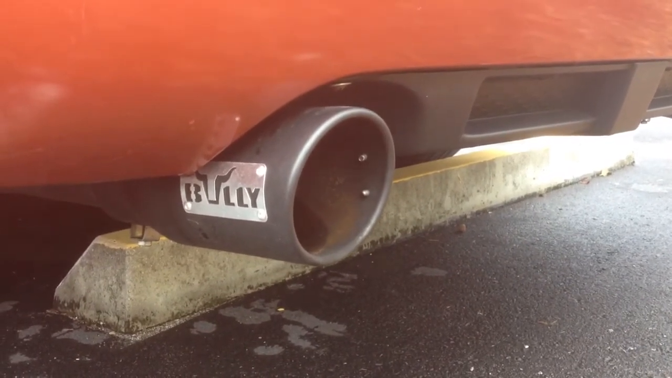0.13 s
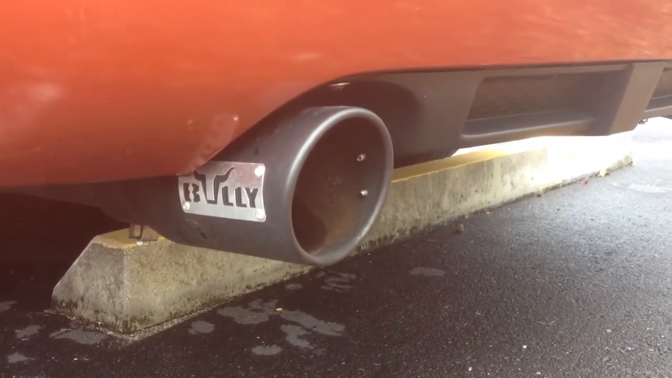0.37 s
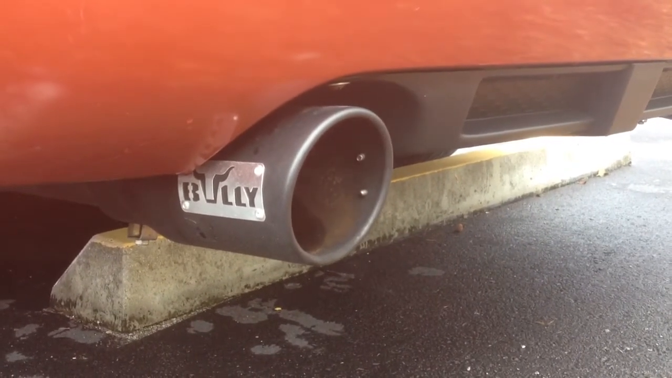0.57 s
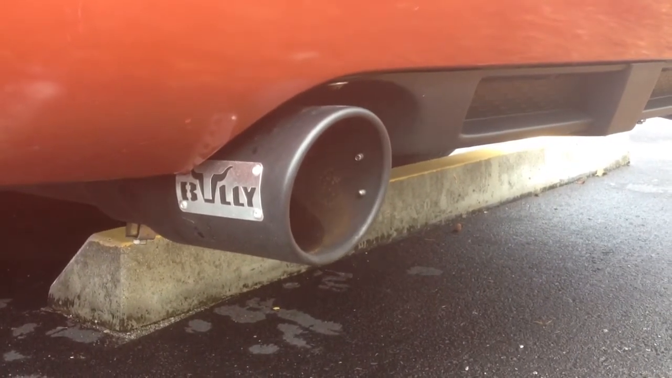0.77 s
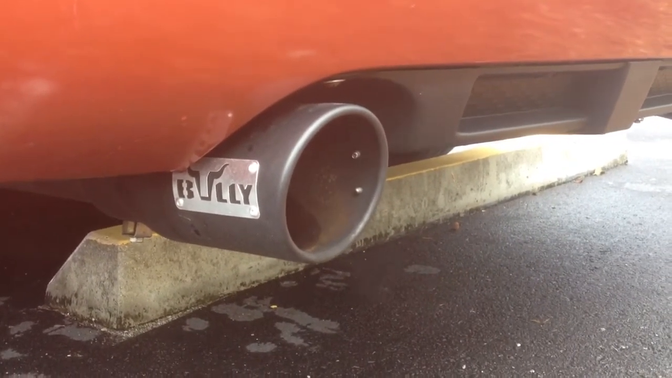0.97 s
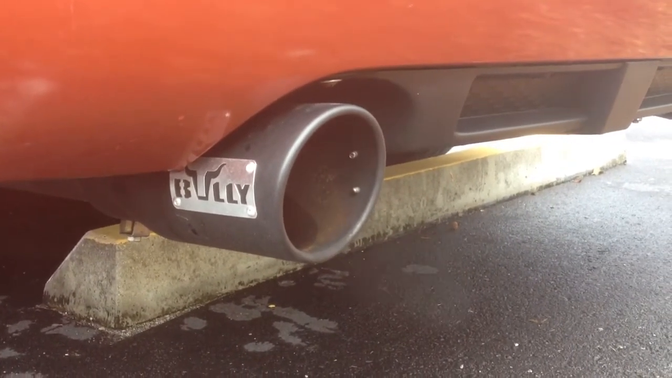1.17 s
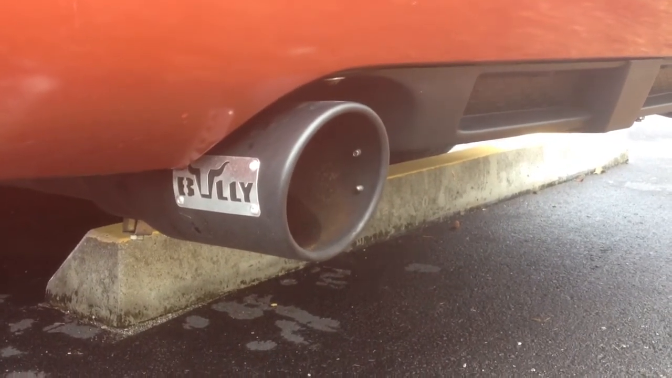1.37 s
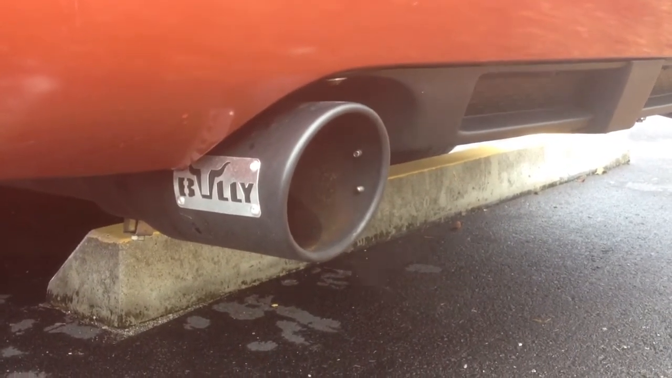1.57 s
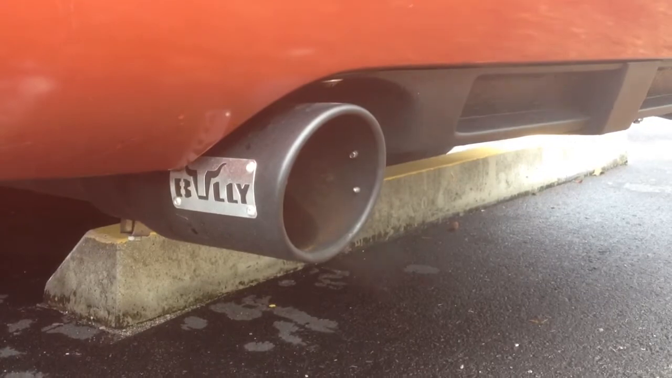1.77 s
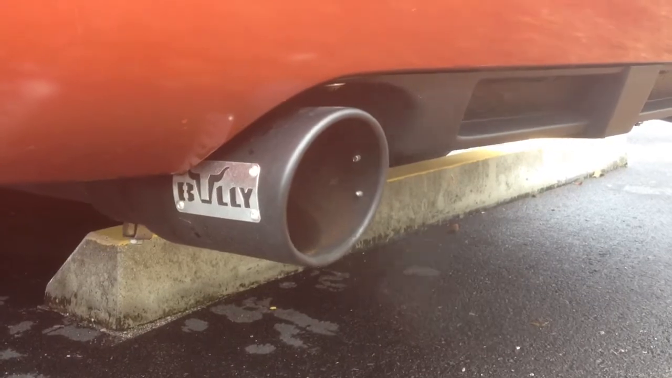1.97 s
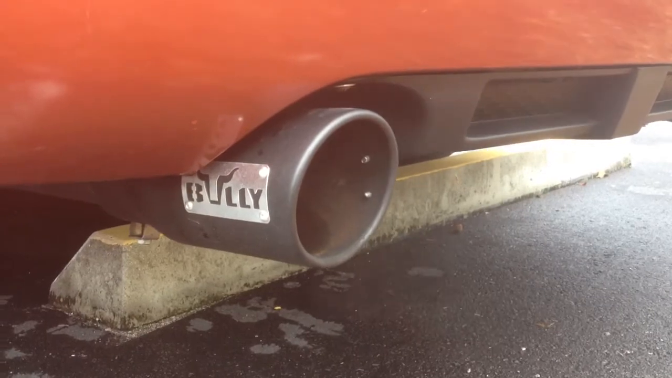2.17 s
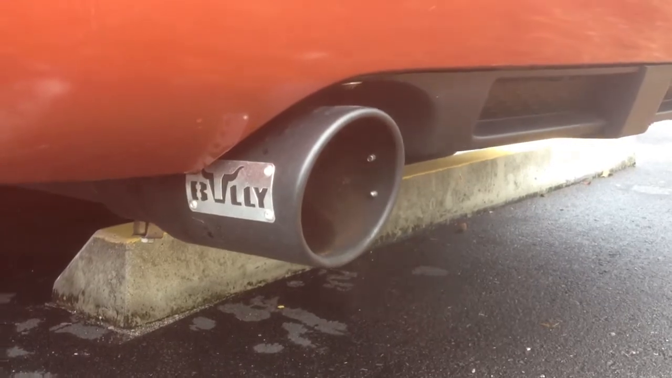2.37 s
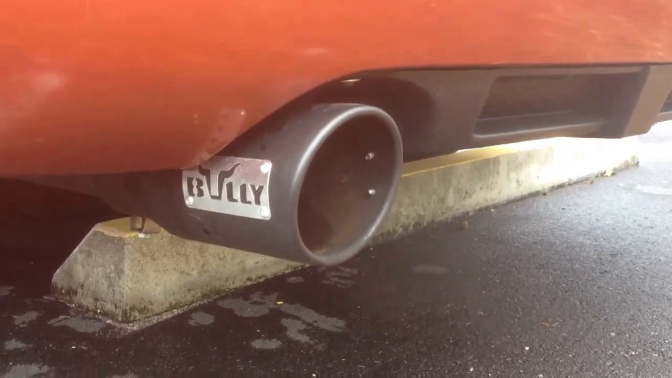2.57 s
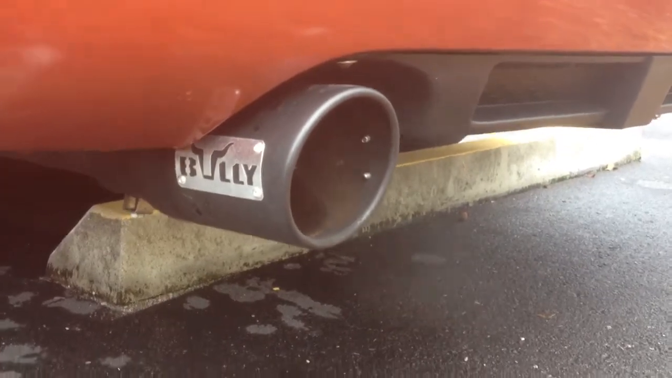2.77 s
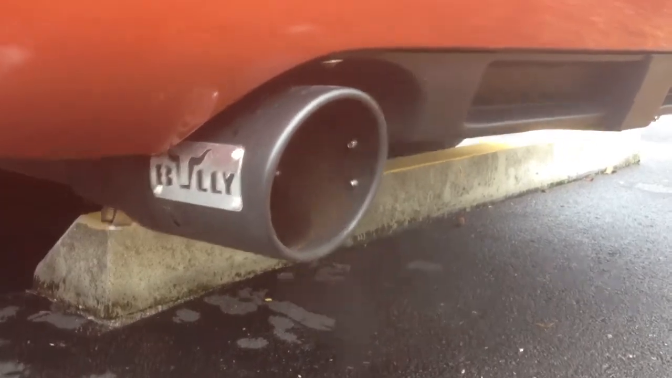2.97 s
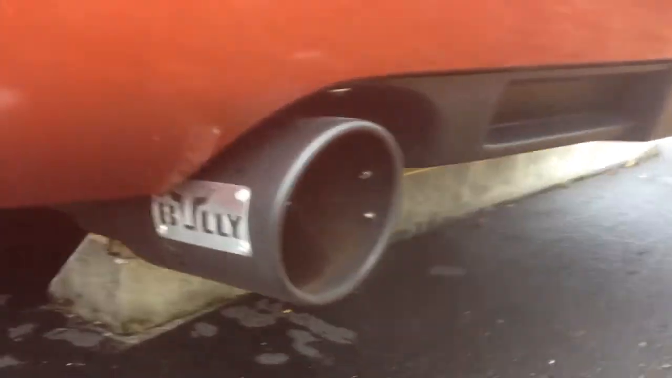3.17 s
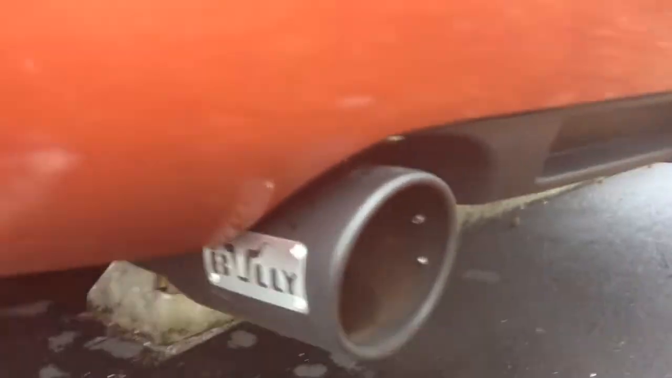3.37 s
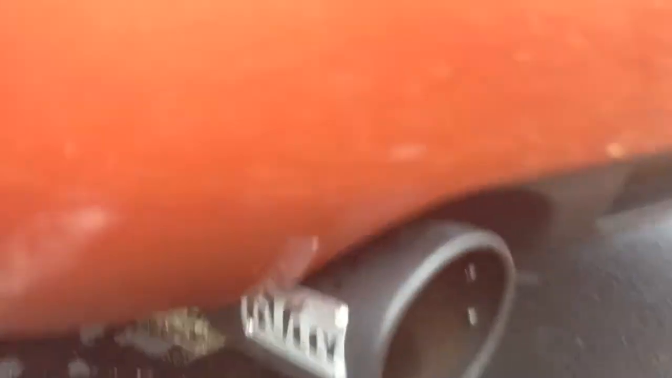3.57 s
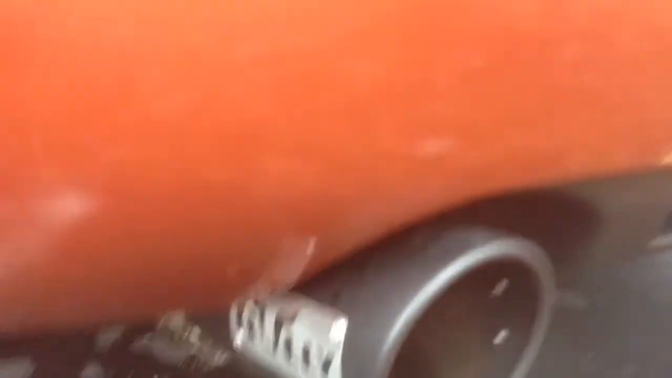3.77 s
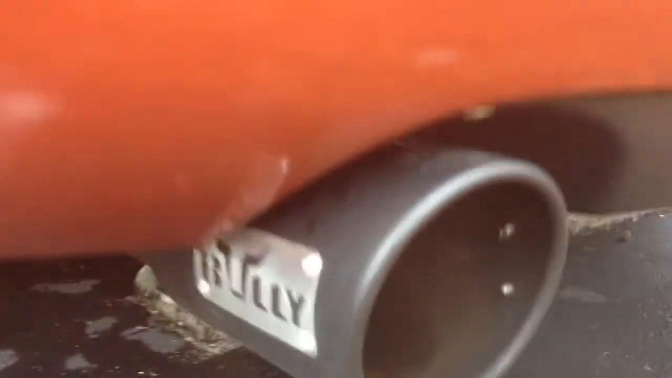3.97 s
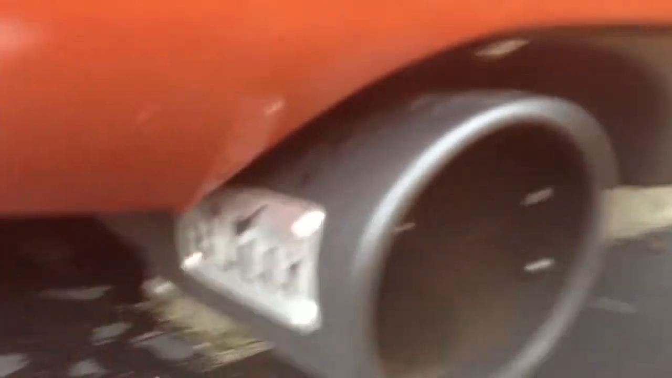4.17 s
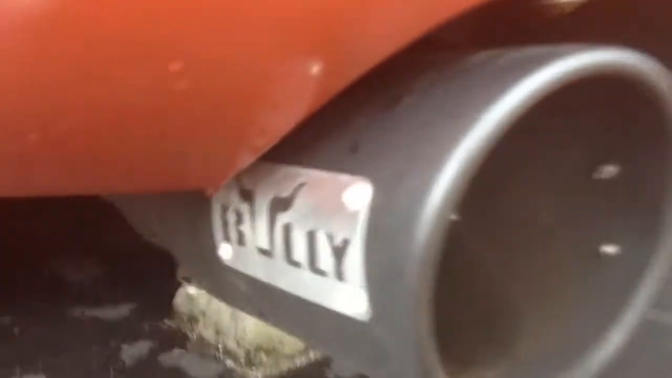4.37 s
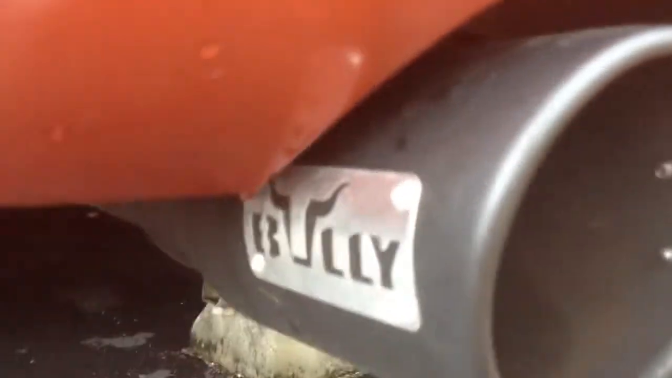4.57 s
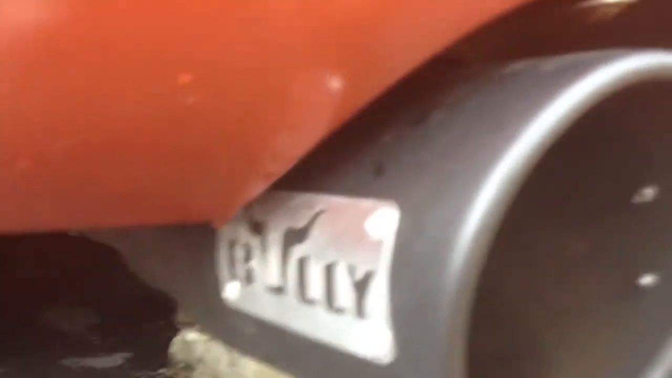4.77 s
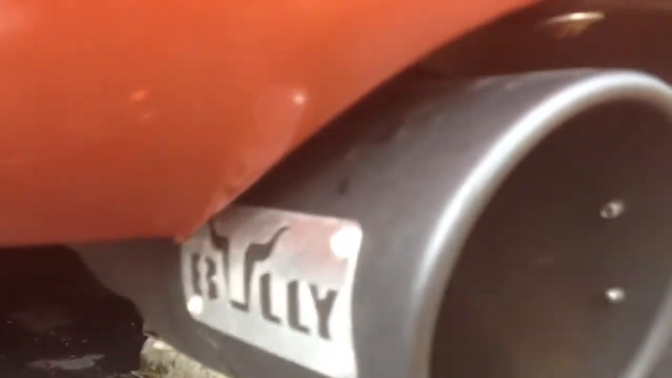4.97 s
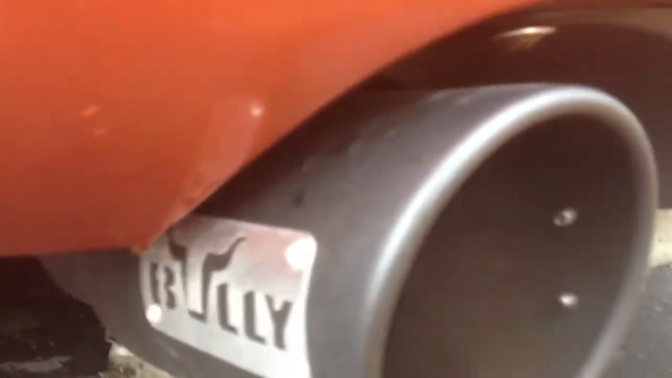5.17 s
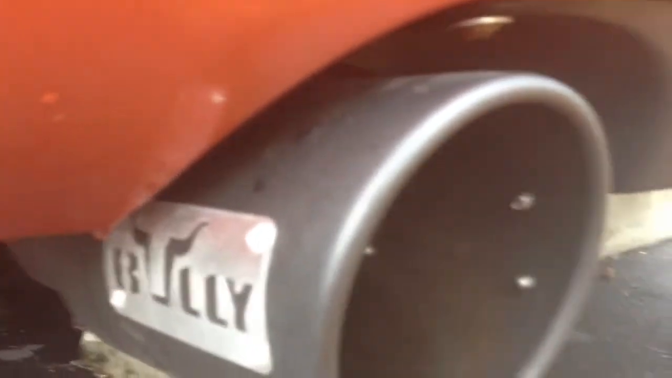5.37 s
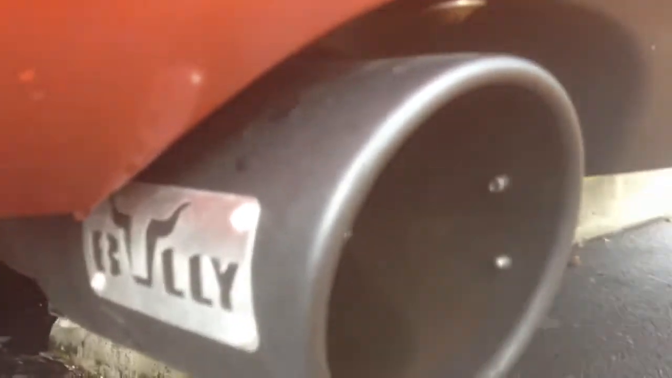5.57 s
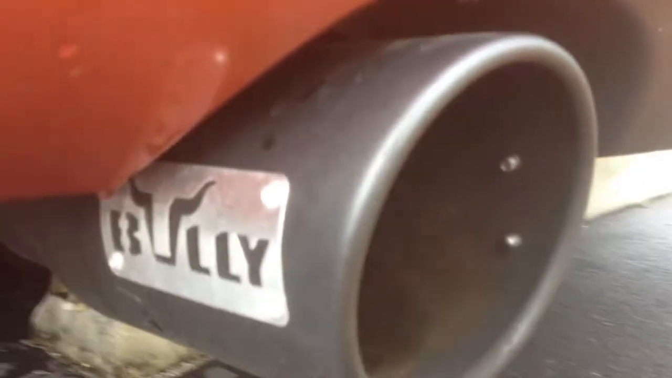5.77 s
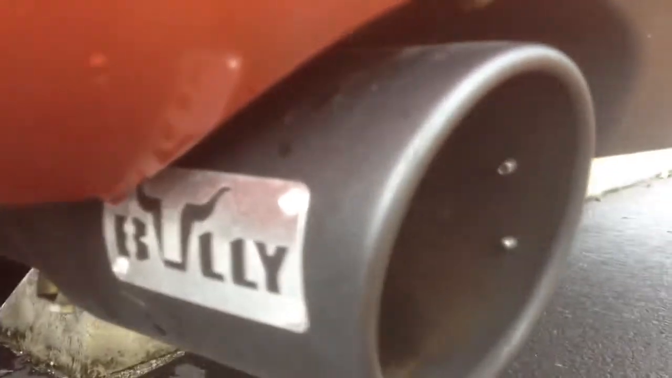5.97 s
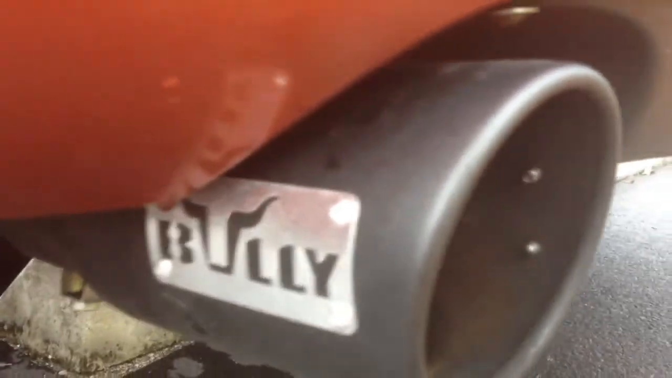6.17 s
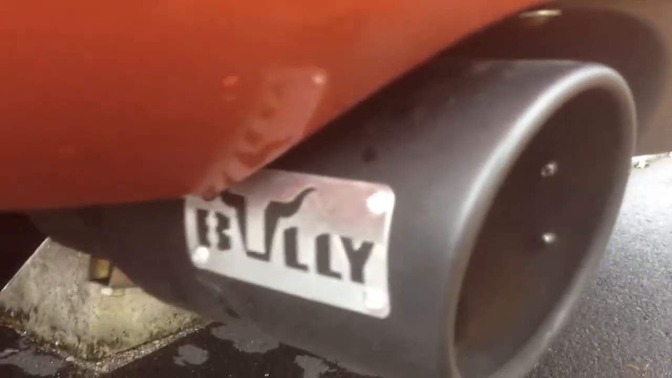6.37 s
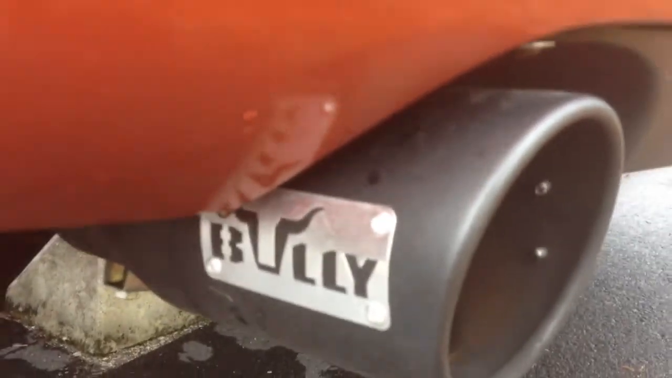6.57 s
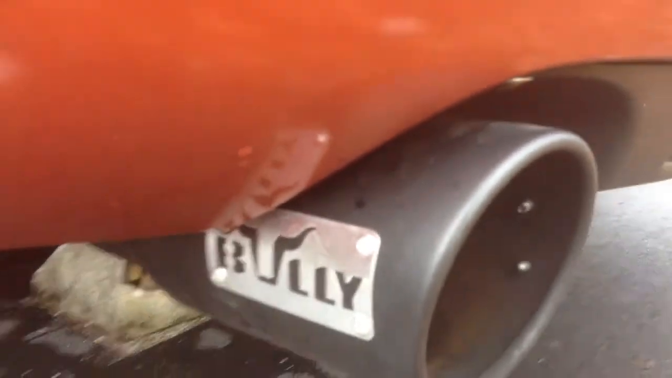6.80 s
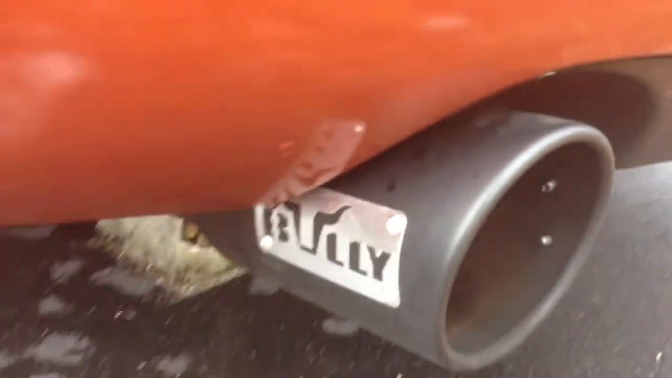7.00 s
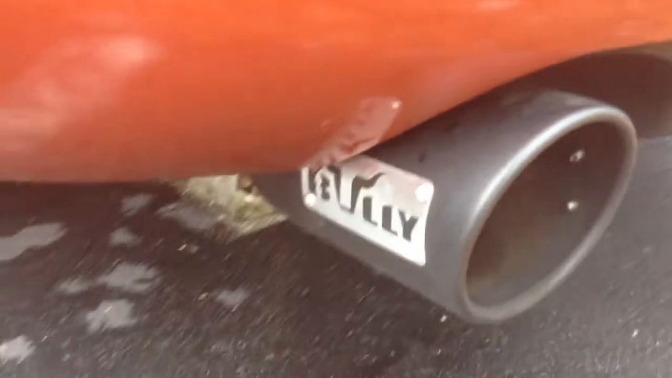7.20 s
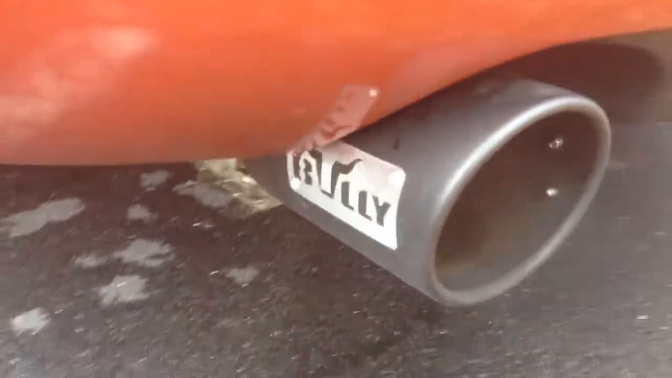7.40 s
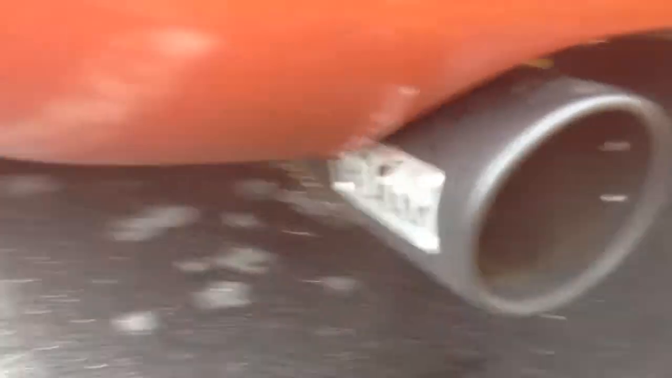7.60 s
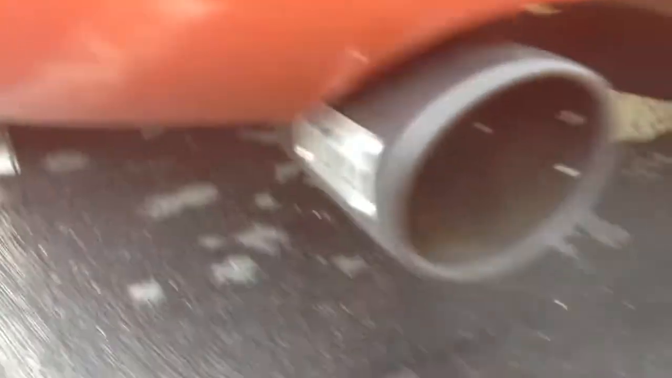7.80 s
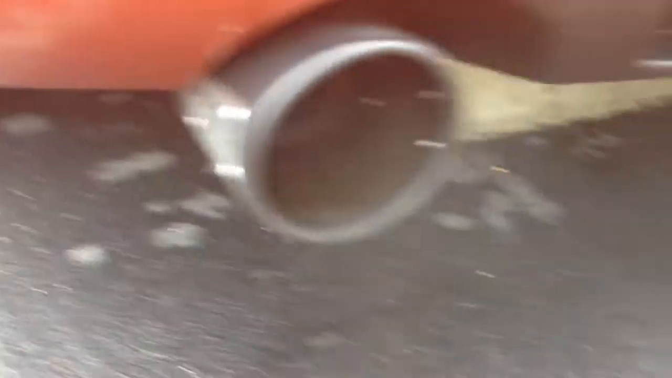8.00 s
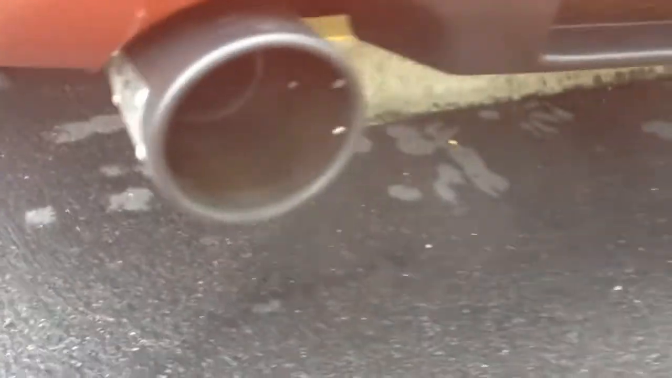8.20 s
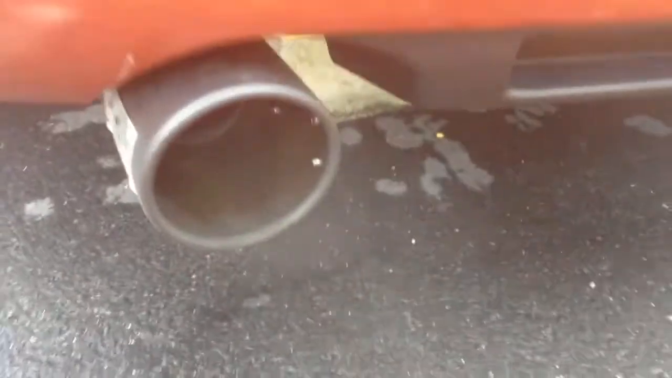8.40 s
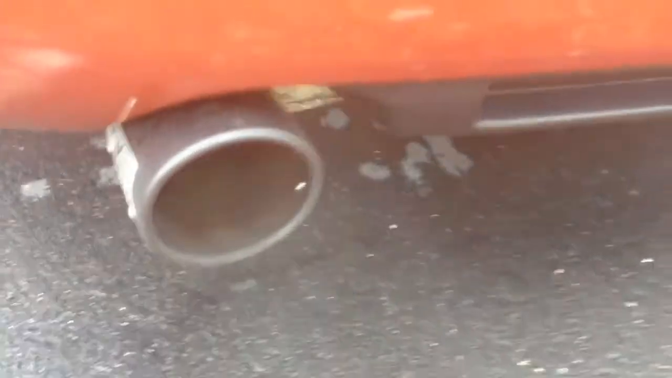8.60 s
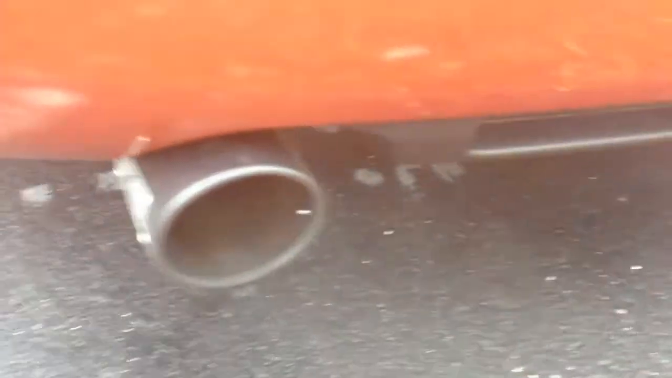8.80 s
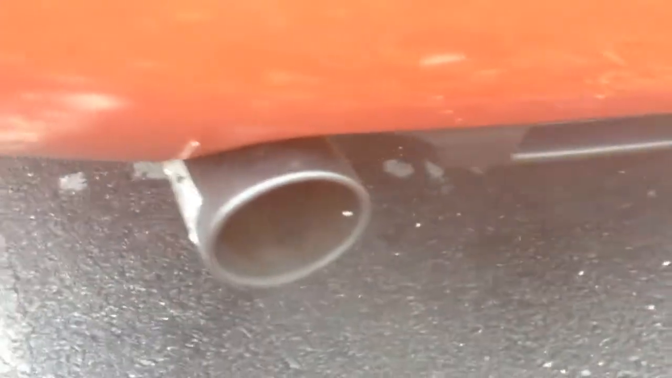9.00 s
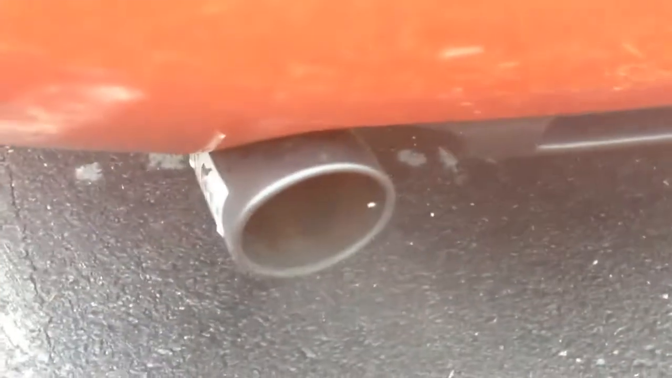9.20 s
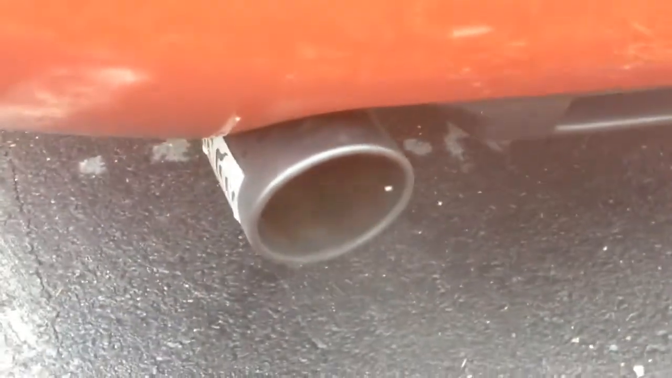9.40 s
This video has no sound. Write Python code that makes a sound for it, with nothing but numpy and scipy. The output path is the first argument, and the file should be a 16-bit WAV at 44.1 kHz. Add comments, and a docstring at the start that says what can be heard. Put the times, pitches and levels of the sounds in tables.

```python
"""Outdoors, behind a car, a V8 idles through a big open tailpipe. The two cylinder banks fire unevenly
into the pipe's resonances, so the drone lopes once per engine cycle. Flow-modulated noise gives puffs
and hiss; noise and crank-locked tones give the engine bay's whir and whine. A hand-held microphone dips
and closes in on the pipe mouth, backs off and swings round above it, with clicks, a scuff and, late on,
a thin squeak; the layers' levels follow that path."""
import sys
import numpy as np
from scipy import signal
from scipy.fft import rfft, irfft, next_fast_len
from scipy.io import wavfile
from scipy.ndimage import map_coordinates

SR = 44100
rng = np.random.default_rng(int(sys.argv[2]) if len(sys.argv) > 2 else 0)


def bounce(signal):
    """Save signal as a 16-bit WAV file at the path given by the first command-line argument."""
    frames = np.transpose(np.atleast_2d(signal))
    limited = np.clip(frames, -1, 1)
    pcm = np.round(limited * 32767).astype(np.int16)
    wavfile.write(sys.argv[1], SR, pcm)


N = 416744


def amp(db):
    """Decibel law: level to amplitude gain."""
    return 10 ** (np.asarray(db) / 20)


def unit(x):
    """Normalisation: scale to rms 1."""
    return x / np.sqrt(np.mean(x ** 2) + 1e-20)


def curves(rows):
    """Linear interpolation: one value per sample for each column after the time."""
    s, *columns = np.transpose(rows)
    return [np.interp(np.arange(N) / SR, s, column) for column in columns]


def wobble(rate):
    """Band-limited fluctuation: a smooth random curve with rate knots a second."""
    knots = rng.standard_normal(int(N * rate / SR) + 4)
    return map_coordinates(knots, [np.arange(N) * rate / SR])


def filtered(x, response):
    """Linear filtering: the spectrum of x times a complex response of frequency."""
    size = x.shape[-1]
    m = next_fast_len(size + SR // 2)
    hz = np.fft.rfftfreq(m, 1 / SR)
    return irfft(rfft(x, m) * response(hz), m)[..., :size]


def noise(spectrum):
    """Spectral shaping: noise of rms 1 whose levels are interpolated over log frequency."""
    f, db = np.transpose(spectrum)

    def shape(hz):
        return amp(np.interp(np.log(hz + 1), np.log(f + 1), db, right=-120))
    return unit(filtered(rng.standard_normal(N), shape))


def resonance(hz, centre, width):
    """Damped oscillator: the causal response of one resonance."""
    return 1j * hz * width / (centre ** 2 - hz ** 2 + 1j * hz * width)


def resonant_noise(centre, width, order=1):
    """Resonance excited by turbulence: noise of rms 1 through one or more equal resonances."""
    return unit(filtered(rng.standard_normal(N), lambda hz: resonance(hz, centre, width) ** order))


# approach to the pipe mouth and retreat: start_s, nearness_db (over the first spot)
NEARNESS = [(0, 0), (2.34, -0.0), (3.56, 1.3), (4.1, 6.5), (4.49, 9.0), (5.24, 9), (6.9, 5.5), (7.3, 3.5),
            (7.9, 4.5), (8.7, 0.9), (9.45, -0.5)]
# dip towards the line of the jet; swing round the tip to look down on it: (start s, end s)
DIP, SWING = (3.05, 3.7), (7.81, 8.94)


def heard(layer):
    """Distance and directivity: a layer's gain as the microphone dips, nears and swings."""
    level_db, per_nearness, dip_db, swing_db = layer
    t = np.arange(N) / SR
    nearness_db, = curves(NEARNESS)
    dipped, swung = np.interp(t, DIP, [0, 1]), np.interp(t, SWING, [0, 1])
    return amp(level_db + per_nearness * nearness_db + dip_db * dipped + swing_db * swung)


# panel hum: crank_order (multiple of crank speed), level_db (before its random swell)
PANELS = [(24, -55), (35, -53), (36, -57), (38.5, -58)]


def underbody(turns):
    """Forced vibration: panels hum roughly along with the crank, at the same level from every spot."""
    hum = 0
    for order, db in PANELS:
        level = amp(db + 2.5 * wobble(25)) * np.sqrt(2)
        hum = hum + level * np.sin(2 * np.pi * order * turns + 1.2 * wobble(30))
    return hum


# whir spectrum: frequency_hz, relative_level_db
BAY = [(440, -23.5), (750, -3.5), (795, -6), (955, -2.5), (1180, -10.5), (1280, -7), (1410, -19),
       (1470, -18), (1600, -17), (1740, -11), (2550, -9), (3230, -12.5), (4110, -16), (4770, -24.5),
       (5500, -25), (7150, -60), (12100, -120)]
# belt-driven accessories: crank_order (multiple of crank speed), relative_level_db, phase_drift_rad
WHINES = [(72.05, -61, 0.56), (54.2, -62, 1.7), (85.7, -68, 1.2), (132.6, -65.5, 2.1), (143.7, -66, 1.6)]
# layer gains: level_db (at the first spot; an offset for the whine), db_per_nearness_db, dip_db, swing_db
WHIR = (-47.5, 0.11, 0, -2.5)
WHINE = (1.5, 0.12, -1.5, -3.5)


def engine_bay(turns):
    """Broadband and order-locked radiation: valve gear whirs, accessories whine with the crank."""
    whir = unit(noise(BAY) * amp(0.93 * wobble(140) + 0.54 * wobble(10)))
    whine = 0
    for order, db, drift in WHINES:
        level = amp(db + 1.3 * wobble(9.9)) * np.sqrt(2)
        whine = whine + level * np.sin(2 * np.pi * order * turns + drift * wobble(22))
    return heard(WHIR) * whir + heard(WHINE) * whine


# a faint thin squeak: one arch of pitch and level
SQUEAK_S, SQUEAK_LENGTH_S, SQUEAK_HZ, SQUEAK_ARCH_HZ, SQUEAK_DB = 8.56, .4, 11100, 850, -64


def squeak():
    """Frequency modulation: a thin, unsteady whistle arches up and falls back."""
    u = np.clip((np.arange(N) / SR - SQUEAK_S) / SQUEAK_LENGTH_S, 0, 1)
    arch = np.abs(np.sin(np.pi * u))
    hz = SQUEAK_HZ + SQUEAK_ARCH_HZ * arch + 90 * wobble(300)
    level = amp(SQUEAK_DB + 2.4 * wobble(40)) * np.sqrt(2 * arch)
    return level * np.sin(2 * np.pi * np.cumsum(hz) / SR)


# scuff spectrum: frequency_hz, relative_level_db
SCUFF = [(200, -10), (700, 9), (1400, 1), (3000, -6), (5000, -11), (8000, -6), (15000, -14)]
# the grip slides once: swells, holds and dies away
SLIDE_S, SLIDE_DB, SLIDE_ATTACK_S, SLIDE_HOLD_S, SLIDE_T60_S = 3.677, -39, 0.026, .04, .16


def scuff():
    """Sliding friction: grainy noise under the envelope of one stroke."""
    t = np.arange(N) / SR - SLIDE_S
    attack = np.clip(t / SLIDE_ATTACK_S, 0, 1)
    decay = amp(-60 * np.maximum(t - SLIDE_ATTACK_S - SLIDE_HOLD_S, 0) / SLIDE_T60_S)
    grains = unit(noise(SCUFF) * amp(3.6 * wobble(300)))
    return amp(SLIDE_DB) * attack * decay * grains


# snap spectrum: frequency_hz, relative_level_db
CLICK = [(1500, -23), (5000, -22), (7500, -2), (13000, -3), (16000, -8)]
# handling clicks: start_s, level_db (before the ring and snap trims), ring_hz, snap_db (relative to level_db)
CLICKS = [(3.207, -27.5, 2980, -19), (3.464, -26, 2070, -25), (3.552, -33.5, 3440, -5),
          (3.5607, -28.5, 2570, -14), (3.612, -25, 1720, -7.5), (3.7896, -24.5, 2480, -20),
          (3.7996, -25.5, 3500, -15), (3.8336, -31, 2480, -13), (3.8702, -36, 2700, -2.5),
          (3.931, -28.5, 3300, -7), (3.941, -24.5, 3380, -11)]


def clicks(t60, snap_t60, ring_db, snap_db):
    """Impact excitation: shifting fingers ring the hand-held shell, each click with a brighter snap."""
    out = np.zeros(N)
    snap = noise(CLICK)
    age = np.arange(SR // 10) / SR
    decay, snap_decay = amp(-60 * age / t60), amp(-60 * age / snap_t60)
    for s, db, centre, bright_db in CLICKS:
        start = round(s * SR)
        span = slice(start, start + len(age))
        burst = rng.standard_normal(len(age))
        shell = unit(filtered(burst, lambda hz: resonance(hz, centre, 400)))
        out[span] += amp(db + ring_db) * decay * shell
        out[span] += amp(db + bright_db + snap_db) * snap_decay * snap[span]
    return out


# hiss spectrum: frequency_hz, relative_level_db
HISS = [(2650, -40), (4500, -13.5), (5700, -7.5), (6510, -3.5), (7210, -6), (9170, -5.5), (14300, 0),
        (15300, -3.5)]
# layer gain: level_db (at the first spot), db_per_nearness_db, dip_db, swing_db
GAS = (-51, 0.18, 0.13, -3)
# one swell per engine cycle: swing either side of the mean, crank angle of the peak
HISS_LOPE_DB, HISS_PEAK_DEG = 0.4, 330


def gas_hiss(turns, flow, throb, spit_rate, spit_db):
    """Turbulent flow noise: fine hiss surges with the flow and lopes with the cycle, with tiny spits."""
    spits = (rng.random(N) < spit_rate / SR) * rng.exponential(size=N)
    spits = signal.lfilter([1], [1, -np.exp(-1 / (0.00092 * SR))], spits)  # each dies away in about 1 ms
    hiss = unit(noise(HISS) * (1 + throb * flow + amp(spit_db) * spits))
    # a cycle is two turns
    lope_db = HISS_LOPE_DB * np.cos(np.pi * turns - np.radians(HISS_PEAK_DEG) / 2)
    return heard(GAS) * amp(lope_db + 0.68 * wobble(35)) * hiss


# layer gains: level_db (at the first spot, before the lip's flutter), db_per_nearness_db, dip_db, swing_db
LIP = (-80, 1.7, 4.5, 2)
HOLLOW = (-69, 0.1, 6.5, 4)


def pipe_tip():
    """Flow-excited resonance: gas grazing the lip sings faintly, and the tip's hollow colours the gas."""
    lip = heard(LIP) * amp(2.6 * wobble(6)) * resonant_noise(4011, 30)
    hollow = heard(HOLLOW) * resonant_noise(1513, 280, order=2)
    return lip + hollow


# low noise spectrum: frequency_hz, relative_level_db
RUMBLE = [(15, 0), (45, 18), (65, -43), (95, 21.5), (170, 11), (300, 18), (450, -2), (900, -9.5),
          (2000, -60)]
# layer gain: level_db (at the first spot), db_per_nearness_db, dip_db, swing_db
RUMBLE_LEVEL = (-37.5, 0.1, 0.6, -4)


def rumble():
    """Low-frequency broadband noise: a steady bed under the drone."""
    return heard(RUMBLE_LEVEL) * noise(RUMBLE)


# the idle hunts a little: start_s, crank_rpm
SPEED = [(0.0, 1047.7), (0.91, 1043.0), (1.12, 1051.7), (2.07, 1048.4), (2.66, 1067.4), (3.27, 1042.5),
         (3.73, 1057.9), (4.32, 1067.9), (5.55, 1031.6), (6.55, 1030.6), (6.84, 1054.9), (7.21, 1052.3),
         (7.58, 1072.0), (8.7, 1050.0), (8.95, 1029.5), (9.45, 1049.0)]


def crank_rpm():
    """Rotational speed: the wandering idle at every sample."""
    return curves(SPEED)[0]


# firings of one 720-degree cycle: crank_angle_deg, strength_db (before scatter), bank (0 or 1)
FIRINGS = [(61, -2.4, 0), (150.6, -1.8, 1), (238.8, 3.2, 0), (334.8, .7, 1), (425.8, -.1, 1),
           (514.3, -1.8, 0), (600.5, 4.3, 1), (689.1, 5, 0)]


def firing_times(turns, scatter_db, jitter_s):
    """Cyclic variation: sample, strength and bank of every firing; no two burns are quite alike."""
    angle, db, bank = np.transpose(FIRINGS)
    cycles = int(turns[-1] / 2) + 1
    at = (2 * np.arange(cycles)[:, None] + angle / 360).ravel()  # in crank turns
    chance = rng.standard_normal((len(at), 2))
    sample = np.interp(at, turns, np.arange(N), right=2 * N) + jitter_s * SR * chance[:, 0]
    size = amp(np.tile(db, cycles) + scatter_db * chance[:, 1])
    keep = (sample >= 0) & (sample < N)
    return sample[keep].astype(int), size[keep], np.tile(bank, cycles)[keep]


def gas_flow(sample, size, puff_s):
    """Pulsating flow: outflow of mean 1 with a short surge after each firing."""
    u = np.arange(SR // 20) / (SR * puff_s)
    pulses = np.bincount(sample, size, N)
    surge = np.abs(signal.fftconvolve(pulses, u * np.exp(-u))[:N])
    return surge / surge.mean()


# exhaust resonances: centre_hz, width_hz, bank_0_gain, bank_1_gain (signed, relative)
PIPE = [(75.0, 15.0, -8.3, 7.6), (79.0, 10.0, -8.1, -18.0), (112.0, 18.0, -49.1, 11.6),
        (113.0, 44.0, 43.5, -0.3), (157.0, 6.0, -17.8, 80.3), (228.0, 17.0, -115.8, -61.0),
        (241.0, 16.0, 69.1, 31.0), (296.0, 9.0, 9.6, -25.5), (337.0, 7.0, 28.9, 47.2),
        (360.0, 10.0, -2.9, -8.5), (409.0, 11.0, 0.7, -2.0), (446.0, 19.0, -1.7, 0.1),
        (501.0, 8.0, -5.7, 6.6), (511.0, 18.0, 2.4, -5.2), (581.0, 11.0, 0.4, -3.7),
        (589.0, 14.0, 2.6, 2.3), (635.0, 17.0, -0.3, 0.7), (674.0, 9.0, -0.9, 1.5),
        (724.0, 20.0, -0.2, 0.3)]


def tailpipe(sample, size, bank, mouth_hz):
    """Modal superposition: each bank's pulses ring the pipe; the open mouth radiates no deep bass."""
    lead = sample[3 * len(FIRINGS)] - sample[0]  # three cycles
    out = 0
    for side in range(2):
        pulses = np.bincount(sample, size * (bank == side), N)
        running = np.concatenate([pulses[:lead], pulses])  # the pipe is already ringing at the start

        def modes(hz):
            return sum(row[2 + side] * resonance(hz, row[0], row[1]) for row in PIPE)
        out = out + filtered(running, modes)

    def mouth(hz):
        return -hz ** 2 / (mouth_hz ** 2 - hz ** 2 + 1j * np.sqrt(2) * hz * mouth_hz)
    return filtered(out, mouth)[lead:]


def low_pass(x, edge, steepness):
    """Low-pass filtering: zero-phase, at half amplitude on the edge in Hz."""
    return filtered(x, lambda hz: 1 / (1 + (hz / edge) ** steepness))


# puff noise spectrum: frequency_hz, relative_level_db
PUFF = [(220, -36), (380, -15), (426, 6.5), (473, -6), (518, -4), (695, -4.5), (879, -26.5), (1040, -27),
        (1140, -49), (1240, -46), (1500, -26), (1950, -55), (3300, -120)]
# layer gains: level_db (at the first spot, before the rasp's own mix), db_per_nearness_db, dip_db, swing_db
THROAT = (-46, 1.085, 2.5, 3.5)
BARK = (-44, 0.935, 3.5, -1.5)


def exhaust_rasp(bark, flow):
    """Amplitude modulation: flow-driven puffs roughen the bark; the throaty half has its own nearness."""
    bark = unit(low_pass(bark, 800, 8))
    puffs = unit(noise(PUFF) * (1 + 0.1 * flow))
    rasp = (amp(-2.5) * bark + amp(-2.0) * puffs) * amp(0.17 * wobble(13))
    # the throaty lower half comes forward close to the mouth
    throat = low_pass(rasp, 560, 24)
    return heard(THROAT) * throat + heard(BARK) * (rasp - throat)


# edges between the pipe's registers: edge_hz
CROSSOVERS_HZ = [180, 275, 390]
# layer gains: level_db (at the first spot, before the ring's swell), db_per_nearness_db, dip_db, swing_db
THUD = (-30, 0.94, -2.2, 4)
DRONE = (-23.5, 1.0365, 0, -4.5)
RING = (-28, 0.39, -1.22, -5.5)
# the pipe rings a little less as the idle speeds up
RING_DB_PER_RPM = -0.12


def exhaust(pipe, flow):
    """Band-dependent radiation: the pipe's registers swell differently as the microphone nears."""
    rpm = crank_rpm()
    below = [low_pass(pipe, edge, 24) for edge in CROSSOVERS_HZ]
    thud, drone, ring, bark = np.diff([np.zeros(N), *below, pipe], axis=0)
    ring = unit(ring) * amp(RING_DB_PER_RPM * (rpm - rpm.mean()) + 1.0 * wobble(18))
    body = heard(THUD) * unit(thud) + heard(DRONE) * unit(drone) + heard(RING) * ring
    return body + exhaust_rasp(bark, flow)


def scene():
    """Superposition: the idling engine, heard from behind the car, and the handling sounds."""
    turns = np.cumsum(crank_rpm()) / 60 / SR
    steady = np.linspace(0, turns[-1], N)
    sample, size, bank = firing_times(steady, scatter_db=.85, jitter_s=.00008)

    def paced(x):
        """Time warping: the lope keeps its shape and only stretches as the idle speed wanders."""
        return np.interp(turns, steady, x)
    pipe = paced(tailpipe(sample, size, bank, mouth_hz=60))
    flow = paced(gas_flow(sample, size, puff_s=0.0025))
    sound = underbody(turns) + engine_bay(turns)
    sound += squeak() + scuff()
    sound += clicks(t60=0.036, snap_t60=0.021, ring_db=-9.5, snap_db=2)
    sound += gas_hiss(turns, flow, throb=0.084, spit_rate=45, spit_db=-2.5)
    sound += pipe_tip() + rumble() + exhaust(pipe, flow)
    return sound[None]


TOP_HZ = 15420  # band limit


def record(dry):
    """Band limiting: the microphone weakens the deepest bass and drops all above its limit."""
    def response(hz):
        low_cut = amp(-17.0) + (1 - amp(-14)) / (1 + (62 / (hz + 1)) ** 16)
        return low_cut * (hz < TOP_HZ)
    return filtered(dry, response)


dry = scene()
out = record(dry)
bounce(out)
```